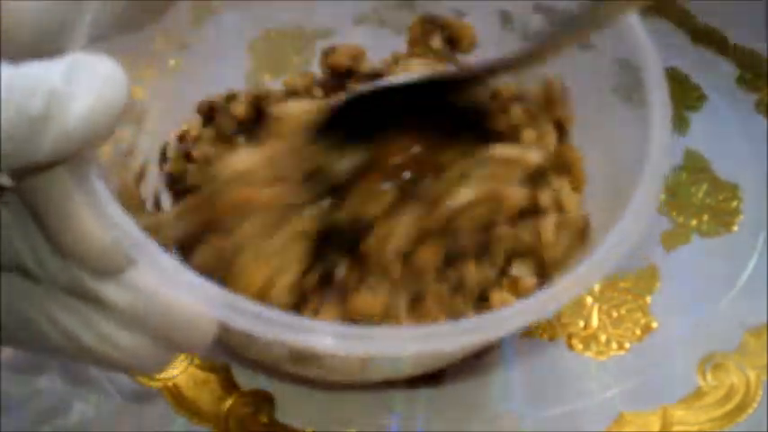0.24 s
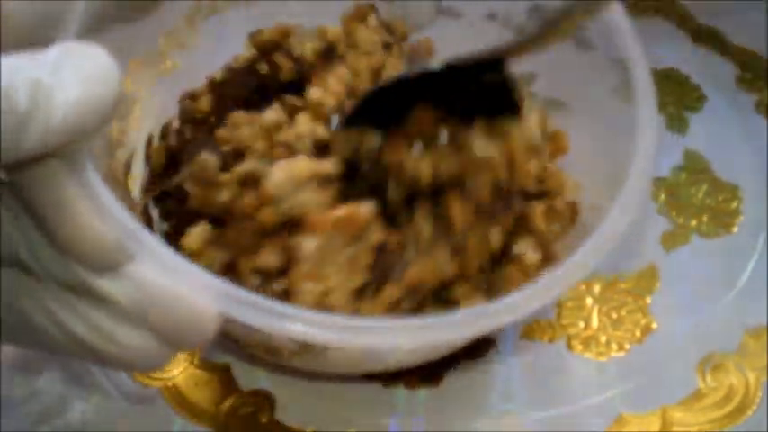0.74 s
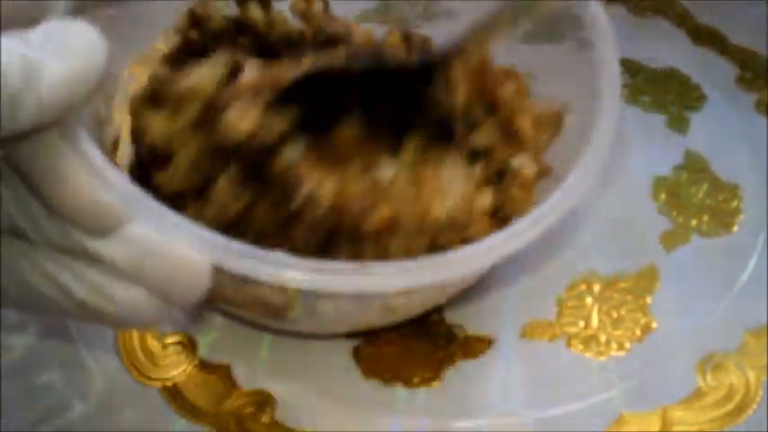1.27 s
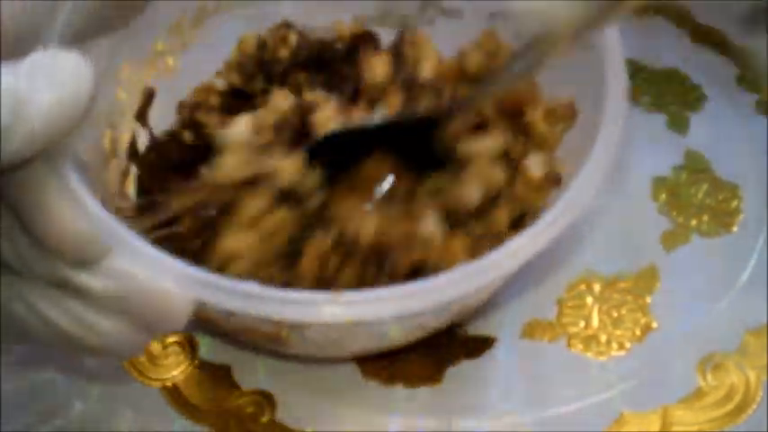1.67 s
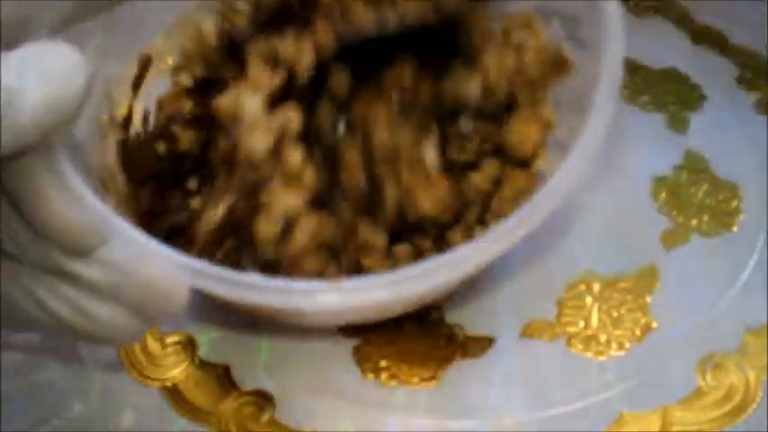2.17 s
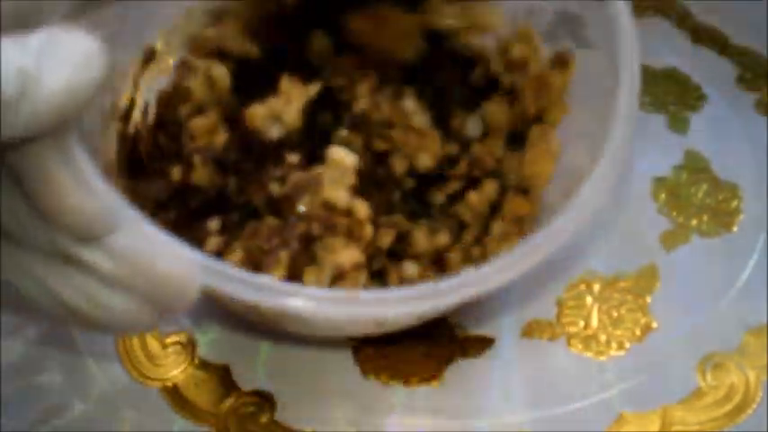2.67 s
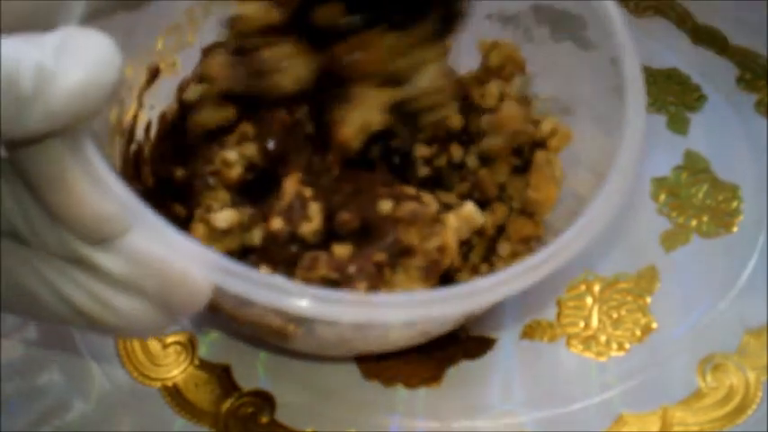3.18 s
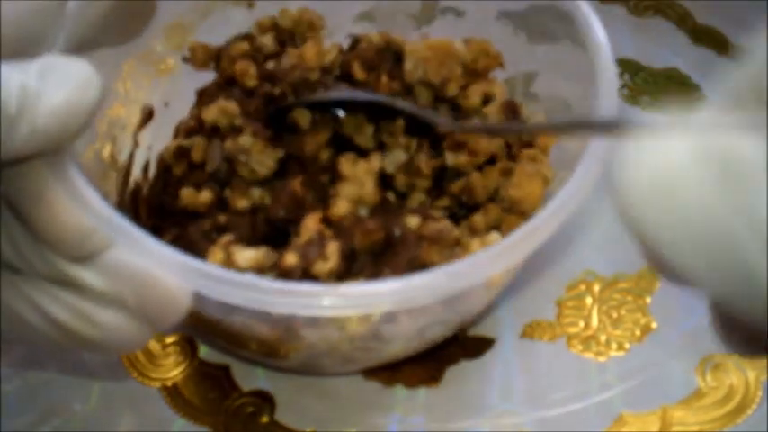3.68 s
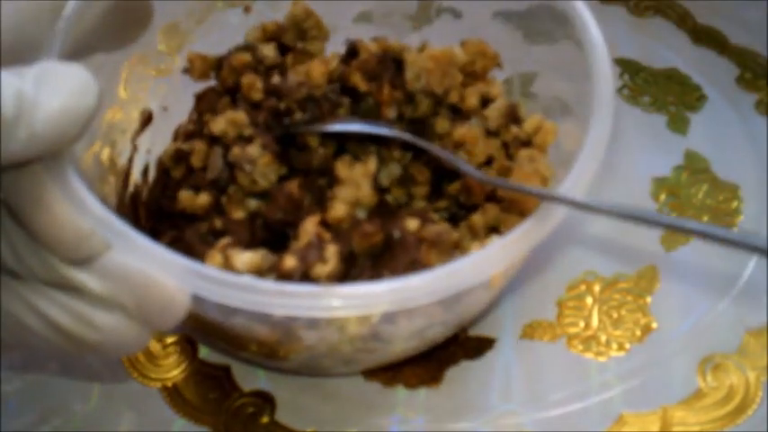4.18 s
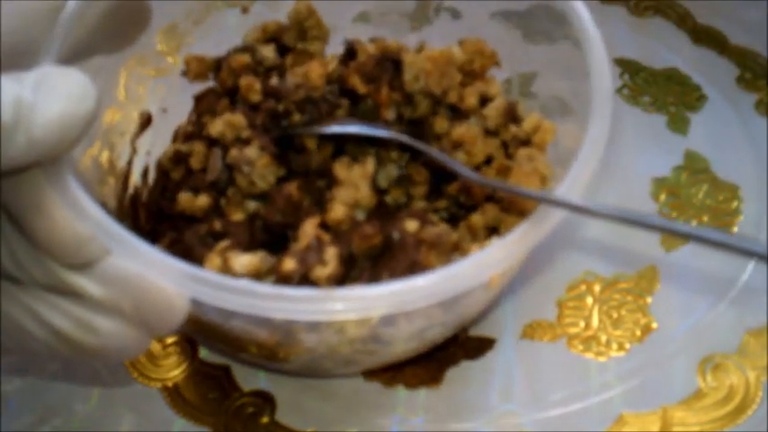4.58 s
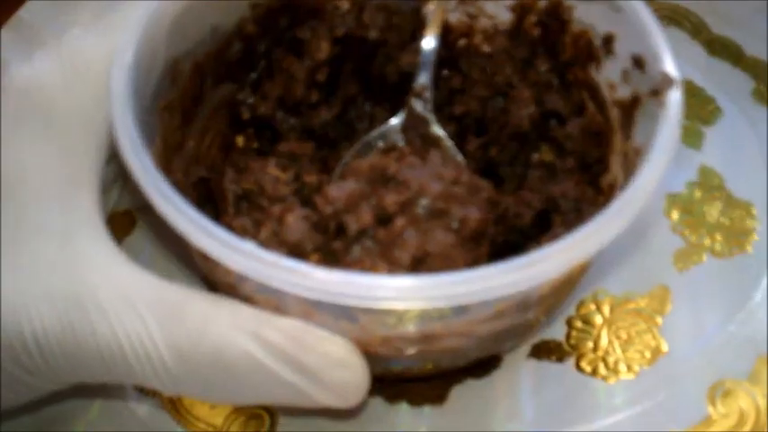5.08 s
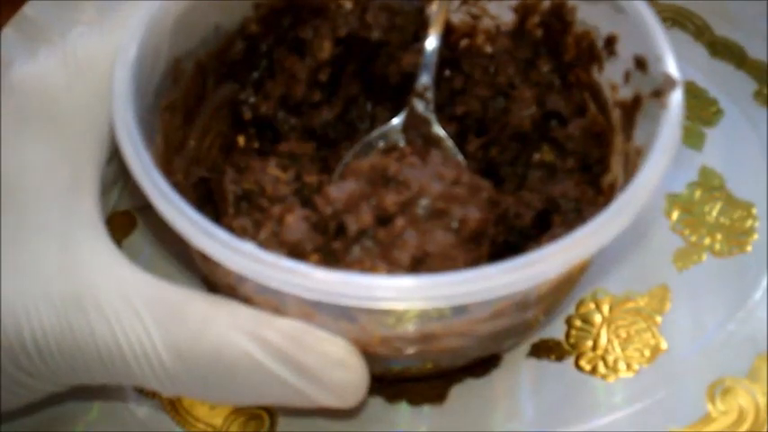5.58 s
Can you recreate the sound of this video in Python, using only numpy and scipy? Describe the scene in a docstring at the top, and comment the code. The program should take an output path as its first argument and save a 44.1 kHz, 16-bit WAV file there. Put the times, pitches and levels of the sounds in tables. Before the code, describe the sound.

Close-up in a quiet room: crunchy, moist spoon strokes grind against a soft plastic tub, first dense, then shorter and clickier. After a lull with a single tap or two, a fast clatter of loud, dry knocks strikes the tub around five seconds, followed by a small scrape and near silence. Dull low thumps with tiny ticks from the camera's motor and a faint rumble persist, the treble slightly muffled.

```python
"""A metal spoon stirs a sticky, crumbly mixture in a plastic tub: random slips ring modes of tub, spoon and edge.
Small crumb contacts and planned knocks strike the same modes; the knocks are hardest near the end.
Two dry pops and a few ringing handle modes follow the knocks; a short room tail answers the spoon and tub.
A camera's lens motor thumps several times a second, each time with a recoil, a shudder and three faint ticks.
Low shaking and quiet room noise lie underneath."""
import sys
import numpy as np
from scipy import signal
from scipy.fft import rfft, irfft, next_fast_len
from scipy.io import wavfile
from scipy.ndimage import map_coordinates

SR = 44100
rng = np.random.default_rng(int(sys.argv[2]) if len(sys.argv) > 2 else 0)


def to_wav(sig):
    """Store sig (one row per channel, or 1-D mono) as 16-bit WAV at the path in sys.argv[1].

    Samples outside -1..1 are clipped; the rate is SR.
    """
    pcm = np.clip(np.atleast_2d(sig), -1, 1) * 32767
    pcm = np.round(pcm).astype(np.int16)
    wavfile.write(sys.argv[1], SR, pcm.T)  # frames by channels


N = 257323

# strokes of the spoon: start_s, attack_s, length_s, tub_db, spoon_minus_tub_db
STROKES = [(-.05, 0.041, 0.15, -46.5, -7), (0.243, 0.097, 0.21, -46.5, -6), (0.69, 0.15, 0.16, -46, -6.5),
           (0.918, 0.052, 0.09, -71, 9), (1.158, 0.0031, 0.23, -47.5, -8.5),
           (1.536, 0.053, 0.043, -48.5, -5), (1.717, 0.085, .14, -51.5, -4),
           (1.988, 0.015, .04, -56.5, -3.5), (2.165, 0.014, 0.034, -51.5, -2.5),
           (2.201, 0.034, 0.09, -51.5, -8), (2.438, 0.035, 0.082, -68, 6), (2.574, 0.0038, 0.094, -53, 0),
           (2.746, 0.019, .15, -57.5, -23), (3.003, 0.1, 0.15, -48.5, -9),
           (3.268, 0.0089, 0.058, -56.5, -8.5), (3.426, 0.044, 0.11, -53, -12.5),
           (5.121, .03, 0.085, -65, 0)]
# spoon leaves the mixture, all earlier strokes stop: time_s
LIFTS_S = [1.04, 5.245]
# spoon contacts: time_s, tub_peak_db, rim_minus_tub_db, spoon_minus_tub_db
TAPS = [(.033, -27, -16, -25), (.076, -27.5, -11, -30), (.325, -35, -13, -11), (.366, -31.5, -13, -10),
        (.571, -44.5, -32, 2), (.857, -38, -20, -6), (.977, -41, -19, -2.5), (1.163, -48, -17, -8),
        (1.188, -33, -21, -25), (1.236, -48, -16, -20), (1.591, -41, -24, -16.5), (1.826, -41, -14, -1),
        (1.999, -41.5, 4.5, -6), (2.237, -33.5, 6, -6.5), (2.265, -36, -32, -5), (2.357, -37, -23, -11.5),
        (2.474, -44.5, 8, 4.5), (2.489, -42.5, -18, -4), (2.582, -43, -19, -27), (2.593, -47, -22, 13),
        (2.622, -35.5, -13, 4.5), (2.631, -32, -29, -25.5), (2.648, -28.5, -35, -1.5),
        (2.701, -37.5, -27, -3), (2.776, -34, -6.5, -16), (2.821, -41, -5, -26), (3.005, -41, -8, -11),
        (3.031, -52, -14, -15), (3.075, -37, -3, -1.5), (3.084, -37, -7, -15), (3.15, -34.5, -34, -2),
        (3.206, -36.5, -21, -8.5), (3.541, -48, 4.5, -7), (3.683, -48, -1, -4), (3.854, -27.5, 1, -21.5),
        (4.259, -46, -8, -15), (4.869, -32, -5.5, -12.5), (4.882, -52, -7, -1), (4.913, -22.5, -23, -36),
        (4.928, -10, -10.5, -16), (4.977, -24, -24, -36), (4.992, -8.5, -14, -19.5), (5.009, -13, -3, -9.5),
        (5.022, -18, -13, -35.5), (5.038, -14, -8.5, -30), (5.047, -31.5, -6, -15),
        (5.178, -49.5, 9.5, 1.5), (5.219, -54.5, 14, 18), (5.225, -37, 5, 4.5), (5.234, -40.5, -21, 3)]
# modes of the tub floor: pitch_hz, relative_level_db, t60_s
TUB_MODES = [(244, -9.5, 0.027), (450, -27, 0.027), (588, -0.5, 0.008), (751, -1, 0.012),
             (911.7, 0.5, 0.016), (1013, -7, 0.03), (1122, 1.5, 0.0057)]
# modes of the stiff tub edge: pitch_hz, relative_level_db, t60_s
RIM_MODES = [(1450, -5, .012), (1700, 0, .014), (1950, -2, .012), (2250, 0, .014)]
# modes of the spoon bowl, damped by the paste: pitch_hz, relative_level_db, t60_s
SPOON_MODES = [(2550, 4, 0.0039), (2605, 0, 0.013), (2870, -19, 0.016), (2930, 1, 0.0023),
               (3600, -21.5, 0.029), (4570, -37.5, 0.0067)]
# modes of the thin edge of the contact: pitch_hz, relative_level_db, t60_s
CRACK_MODES = [(5200, -47.5, .01), (5920, 23.5, 0.0057), (7324, 22.5, 0.0054), (7160, 11, 0.028)]
# dry pops without a ring: time_s, peak_db
POPS = [(5.084, -46.5), (5.112, -42)]
# free handle rings on: time_s, pitch_hz, peak_db, t60_s
PINGS = [(4.917, 3850, -72, .2), (4.931, 3343, -59, .2), (5.012, 6900, -66, .08), (5.238, 3844, -66, .17)]
# spoon and tub sound sent into the room: time_s, send_db
ROOM_SEND = [(0, -18), (3.9, -10), (4.1, -36.5), (5.83, -24.5)]
# decay of the room: frequency_hz, t60_s
ROOM_DECAY = [(300, .3), (2000, .3), (8000, .12)]
# motor thumps: time_s, push_peak_db, recoil_peak_db
THUMPS = [(.003, -21.5, -24), (0.189, -23, -23), (.398, -23.5, -22), (0.455, -21.5, -23),
          (0.604, -20.5, -26), (0.806, -29, -21), (1.003, -27.5, -19), (1.054, -26, -22), (1.186, -23, -23),
          (1.389, -23.5, -24.5), (1.593, -24.5, -21.5), (1.642, -26, -22.5), (1.79, -23.5, -21.5),
          (1.995, -23, -22), (2.042, -32, -18), (2.202, -23, -25), (2.387, -23.5, -23.5),
          (2.601, -25.5, -29.5), (2.79, -29, -44), (2.988, -33.5, -40), (3.213, -28, -30),
          (3.794, -29.5, -28), (4.19, -20.5, -51), (4.219, -25.5, -23), (4.255, -22.5, -23.5),
          (4.403, -24.5, -24), (4.601, -26.5, -23), (4.643, -26.5, -22), (4.794, -24.5, -27.5),
          (4.994, -26, -19), (5.047, -31, -24), (5.171, -20, -21.5), (5.37, -21, -25.5),
          (5.583, -22.5, -33), (5.645, -26.5, -32.5), (5.775, -25, -22.5)]
# modes of the camera body: pitch_hz, relative_level_db, t60_s
CASE_MODES = [(122.5, 9.5, 0.024), (170, -9.5, 0.046), (265.2, -7, 0.051)]
# modes of one motor step: pitch_hz, relative_level_db, t60_s
TICK_MODES = [(1750, -1, .015), (1950, 0, .02), (2150, -2, .015), (6000, -27, .025)]
# level of the low shaking: time_s, level_db
SHAKE_LEVEL = [(0.0, -46.5), (2.1, -43.5), (3.05, -46.5), (3.4, -36.5), (4.06, -38.5), (4.24, -45),
               (5.02, -46), (5.4, -49), (5.83, -52)]
# spectrum of the low shaking: frequency_hz, relative_db_per_hz
SHAKE_SPECTRUM = [(8.8, -44), (15, 16), (73, 1.5), (128, -7.5), (198, -15.5), (300, -22), (390, -89),
                  (660, -120)]
# spectrum of the room noise: frequency_hz, relative_db_per_hz
AIR_SPECTRUM = [(88, -49), (150, -5.5), (324, -10.5), (492, -2.5), (572, -9.5), (883, -9.5), (1170, -21),
                (1390, -23), (2290, -30), (2660, -30), (2900, -35.5), (3310, -39.5), (5100, -54),
                (6100, -46.5), (7000, -40), (8170, -50.5), (10600, -76.5), (18000, -120)]

# a stroke drops fast onto a weaker drag that fades slowly
DROP_DB_PER_S, TRAIL_DB, TRAIL_DB_PER_S = 354.5, -6.5, 35
STIR_CRACK_DB = -20  # thin edge minus spoon while stirring
TAP_CRACK_DB, CRACK_FOLLOWS = -14.5, .93  # thin edge minus tub peak; how far it follows the spoon's share
CRUMB_COUNT, CRUMBS_END_S = 130, 3.7
CRUMB_PEAK_DB, CRUMB_SPREAD_DB = 10, 16  # loudest peak over the grinding; range of sizes
RECOIL_START_S = .0219  # after the start of the push
SHUDDER_DB = -11.5  # relative to the mean of push and recoil
STEP_S, TICK_LAG_S, TICK_DB = .008, .002, -21  # tick level relative to the shudder
AIR_DB = -54.5


def amp(db):
    """Decibels to gain."""
    return 10 ** (np.asarray(db) / 20)


def unit(x):
    """Scaled to rms 1."""
    return x / np.sqrt(np.mean(x ** 2) + 1e-20)


def along(points, hz):
    """(Hz, value) points interpolated on a log frequency axis."""
    point_hz, value = np.transpose(points)
    return np.interp(np.log(hz + 1), np.log(point_hz + 1), value)


def curve(rows):
    """(s, value) rows as one value per sample."""
    time_s, value = np.transpose(rows)
    return np.interp(np.arange(N) / SR, time_s, value)


def wobble(knots_per_s):
    """A smooth random curve."""
    knots = rng.standard_normal(int(N * knots_per_s / SR) + 4)
    return map_coordinates(knots, [np.arange(N) * knots_per_s / SR])


def filtered(x, response):
    """x shaped by a response of frequency."""
    size = next_fast_len(N + SR // 2)
    spectrum = rfft(x, size) * response(np.fft.rfftfreq(size, 1 / SR))
    return irfft(spectrum, size)[..., :N]


def noise(spectrum):
    """Coloured noise of rms 1."""
    return unit(filtered(rng.standard_normal(N), lambda hz: amp(along(spectrum, hz))))


def ring(modes, scatter_db, detune, soft_cycles):
    """One blow on decaying modes, each at a random strength and slightly off pitch; peak 1."""
    hz, db, t60_s = np.transpose(modes)[:, :, None]
    t = np.arange(int(1.3 * t60_s.max() * SR)) / SR
    strength, shift = rng.standard_normal((2, len(modes), 1))
    rise = (1 - np.exp(-t * hz / soft_cycles)) ** 2  # contact builds over soft_cycles periods of each mode
    decay = amp(db + scatter_db * strength - 60 * t / t60_s)
    x = np.sum(rise * decay * np.sin(2 * np.pi * hz * (1 + detune * shift) * t), axis=0)
    return x / np.abs(x).max()


def add(track, time_s, x):
    """Mixes x into track at time_s."""
    part = track[round(time_s * SR):][:len(x)]
    part += x[:len(part)]


def pressure():
    """Gains of tub, spoon and crack: each stroke rises, holds, drops and trails off or is lifted."""
    t, power = np.arange(N) / SR, np.zeros((3, N))
    for start_s, attack_s, length_s, tub_db, spoon_db in STROKES:
        after_s = np.clip(t - start_s - length_s, 0, None)
        release = np.maximum(amp(-DROP_DB_PER_S * after_s), amp(TRAIL_DB - TRAIL_DB_PER_S * after_s))
        shape = np.clip((t - start_s) / attack_s, 0, 1) * release
        for lift_s in LIFTS_S:
            if start_s < lift_s:
                shape = shape * amp(-DROP_DB_PER_S * np.clip(t - lift_s, 0, None))
        layer_db = tub_db + np.array([[0], [spoon_db], [spoon_db + STIR_CRACK_DB]])
        power += (shape * amp(layer_db)) ** 2
    return np.sqrt(power)


def stirring():
    """Crumbs slip and snap in clumps; each slip rings tub, spoon and the thin edge of the contact."""
    clumps = amp(np.clip(1.7 * wobble(30) + 2.6 * wobble(120), -9, 5))
    hits = rng.random(N) < 1500 / SR  # 1500 snaps per s on average
    snaps = unit(hits * amp(3 * rng.standard_normal(N)) * rng.standard_normal(N))
    rim = [(hz, db - 16, t60_s) for hz, db, t60_s in RIM_MODES]
    upper_rim = [(hz, db - 7, t60_s) for hz, db, t60_s in RIM_MODES[2:]]
    layers = [(TUB_MODES[2:] + rim, .8), (SPOON_MODES + upper_rim, .55), (CRACK_MODES, .55)]
    out = np.zeros(N)
    for gain, (modes, drag) in zip(pressure(), layers):
        slips = clumps * (snaps + drag * rng.standard_normal(N))  # paste drags evenly under the crumbs
        rung = np.zeros(N)
        for mode in modes:
            drive = amp(mode[1] + 2 * wobble(25))  # the moving spoon drives each mode unevenly
            tone = ring([mode], scatter_db=0, detune=0, soft_cycles=.7)[:SR // 16]
            rung += signal.fftconvolve(drive * slips, tone)[:N]
        out += gain * unit(rung)
    return out


def crumbs():
    """Random small contacts scaled by stroke pressure, as rows like TAPS."""
    place, size, rim, dull = rng.random((CRUMB_COUNT, 4)).T
    time_s = place * CRUMBS_END_S
    tub_db, spoon_db = 20 * np.log10(pressure()[:2, (time_s * SR).astype(int)] + 1e-9)
    peak_db = tub_db + CRUMB_PEAK_DB - CRUMB_SPREAD_DB * size
    return list(zip(time_s, peak_db, -4 - 16 * rim, spoon_db - tub_db - 12 * dull))


def taps():
    """Each contact rings tub, rim, spoon and thin edge, and chatters for a few ms as it settles."""
    out, t = np.zeros(N), np.arange(SR // 40) / SR
    for time_s, peak_db, rim_db, spoon_db in TAPS + crumbs():
        crack_db = TAP_CRACK_DB + CRACK_FOLLOWS * spoon_db
        parts = [(TUB_MODES, 0, .38), (RIM_MODES, rim_db, .28),
                 (SPOON_MODES, spoon_db, 1.42), (CRACK_MODES, crack_db, 3.6)]
        for modes, part_db, soft_cycles in parts:
            chatter = amp(-20 - 60 * t / .015) * rng.standard_normal(len(t))
            chatter[0] = 1  # the blow itself
            blow = signal.fftconvolve(ring(modes, 2.5, .015, soft_cycles), chatter)
            add(out, time_s, amp(peak_db + part_db) * blow / np.abs(blow).max())
    return out


def pops():
    """A pulse that flips sign after 0.1 ms and dies without a ring."""
    out, t = np.zeros(N), np.arange(SR // 40) / SR - .0001
    for time_s, peak_db in POPS:
        add(out, time_s, amp(peak_db) * np.sign(-t) * np.exp(-np.abs(t) / .00033))
    return out


def pings():
    """Single thin modes of the spoon handle."""
    out = np.zeros(N)
    for time_s, hz, peak_db, t60_s in PINGS:
        add(out, time_s, amp(peak_db) * ring([(hz, 0, t60_s)], scatter_db=0, detune=0, soft_cycles=8))
    return out


def room(x):
    """Convolves x with a noise tail whose frequencies each die at their own speed."""
    hz, t, grid = signal.stft(rng.standard_normal(SR // 2), SR, nperseg=256)
    decay = amp(-60 * t / along(ROOM_DECAY, hz)[:, None])
    tail = signal.istft(grid * decay, SR, nperseg=256)[1]
    delayed = np.pad(x, (200, 0))  # samples
    return signal.fftconvolve(delayed, tail / np.linalg.norm(tail))[:N]


def lobe(t, start_s, rise_s):
    """A smooth pressure pulse that peaks at 1, rise_s after its start."""
    x = np.clip((t - start_s) / rise_s, 0, None)
    return x ** 2 * np.exp(2 - 2 * x)


def motor():
    """A push, a slower recoil, and three steps about 8 ms apart that shake the body and tick near 2 kHz."""
    out, t = np.zeros(N), np.arange(SR // 8) / SR
    scatter_db, detune = 3, .06
    for time_s, push_db, recoil_db in THUMPS:
        push = amp(push_db) * lobe(t, 0, .0081)
        recoil = amp(recoil_db) * lobe(t, RECOIL_START_S, .011)
        add(out, time_s - .003, push - recoil)
        shudder_db = (push_db + recoil_db) / 2 + SHUDDER_DB
        for step in range(3):
            step_s = time_s + STEP_S * step
            shudder = amp(shudder_db) * ring(CASE_MODES, scatter_db, detune, soft_cycles=.4)
            tick = amp(shudder_db + TICK_DB) * ring(TICK_MODES, scatter_db, detune / 4, soft_cycles=2.2)
            add(out, step_s + abs(rng.normal(0, .0015)), shudder)
            add(out, step_s + TICK_LAG_S, tick)
    return out


def shaking():
    """Low noise of unsteady level under the thumps."""
    return amp(curve(SHAKE_LEVEL) + 1.1 * wobble(9.5)) * noise(SHAKE_SPECTRUM)


def air():
    """Steady room noise that breathes a little."""
    breath = amp(.8 * wobble(5) + .8 * wobble(25))
    return amp(AIR_DB) * breath * noise(AIR_SPECTRUM)


def scene():
    """Spoon and tub with their room tail, then handle, motor, shaking and air."""
    near = stirring() + taps() + pops()
    tail = room(amp(curve(ROOM_SEND)) * near)
    return (near + tail + pings() + motor() + shaking() + air())[None]


def record(dry):
    """The input stage rounds hard peaks, leaks slow pressure away and cuts all above its band limit."""
    low_hz, fade_hz, top_hz, ceiling = 12, 8100, 8250, .4
    rounded = dry / (1 + np.abs(dry / ceiling) ** 4) ** (1 / 4)

    def response(hz):
        """First-order low cut, steep fade and hard top limit."""
        low_cut = 1j * hz / (low_hz + 1j * hz)
        return low_cut / (1 + (hz / fade_hz) ** 60) * (hz < top_hz)

    return filtered(rounded, response)


dry = scene()
out = record(dry)
to_wav(out)
```